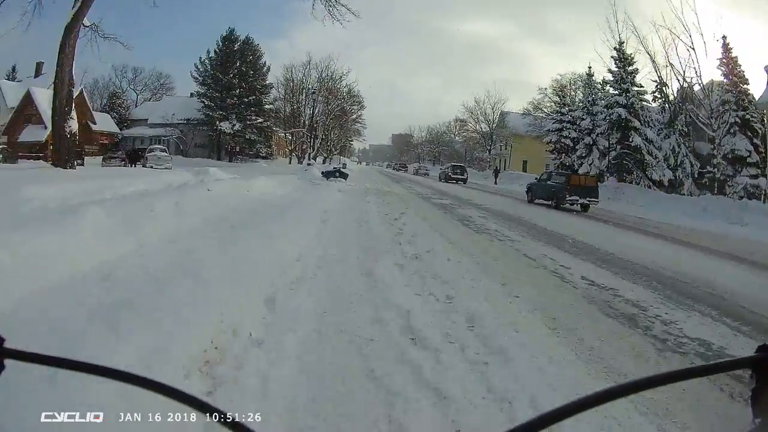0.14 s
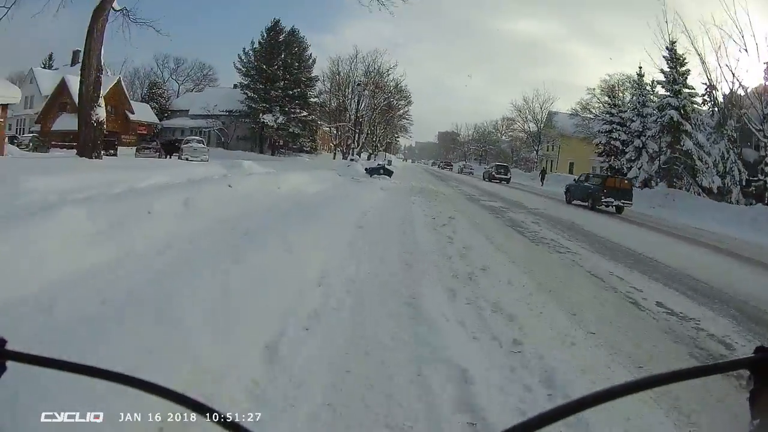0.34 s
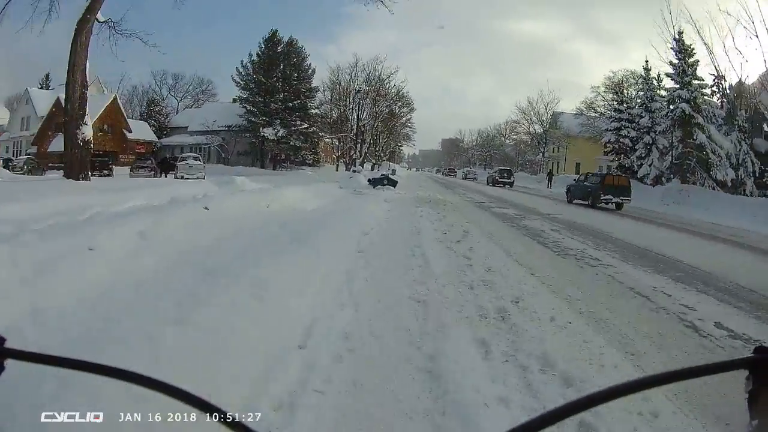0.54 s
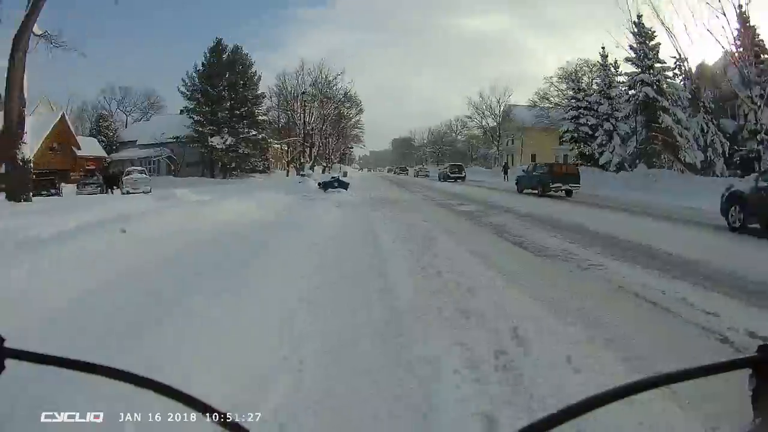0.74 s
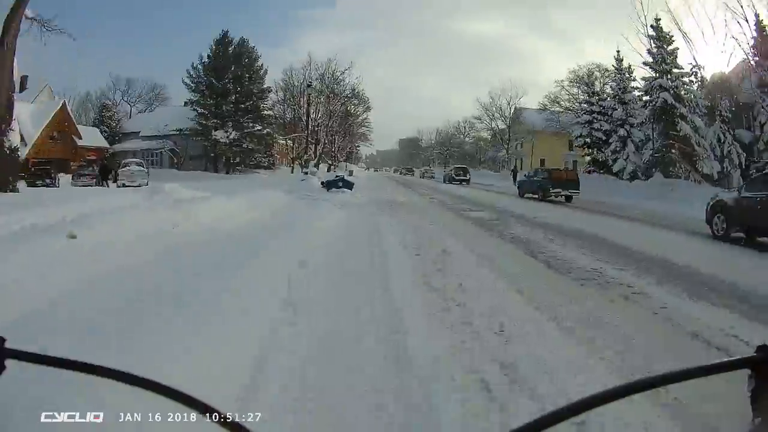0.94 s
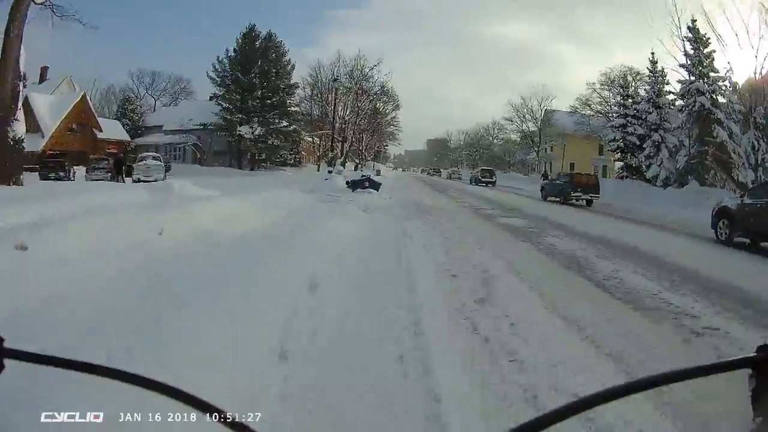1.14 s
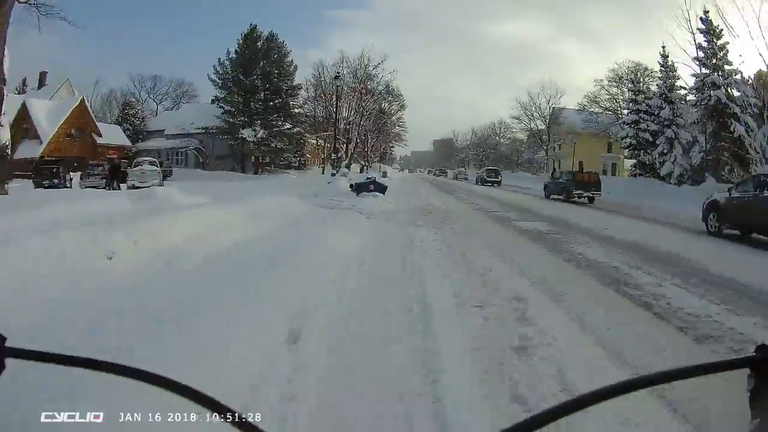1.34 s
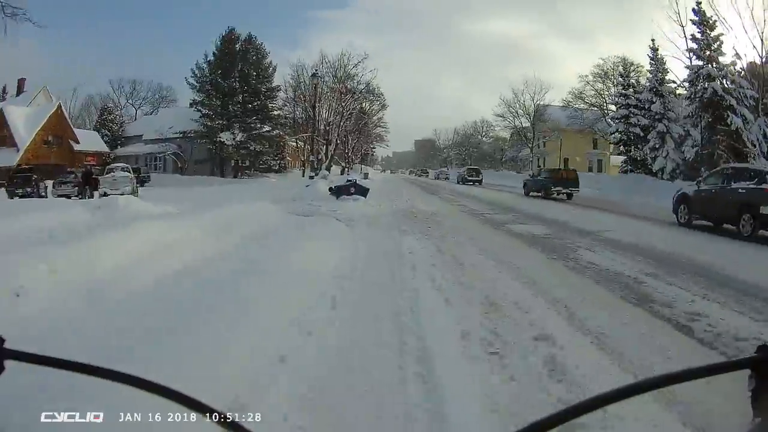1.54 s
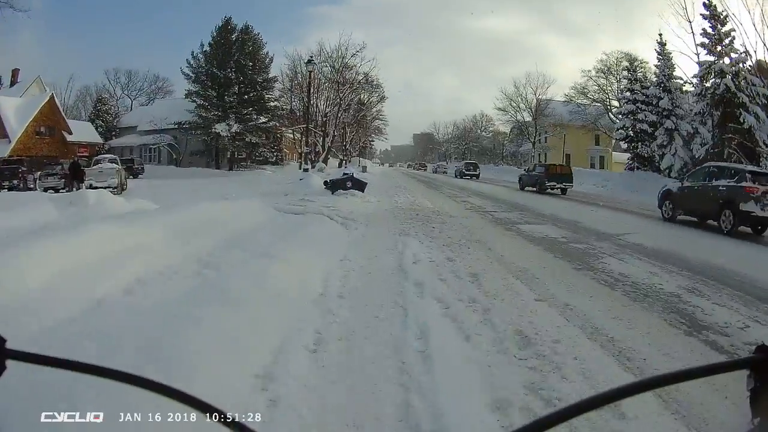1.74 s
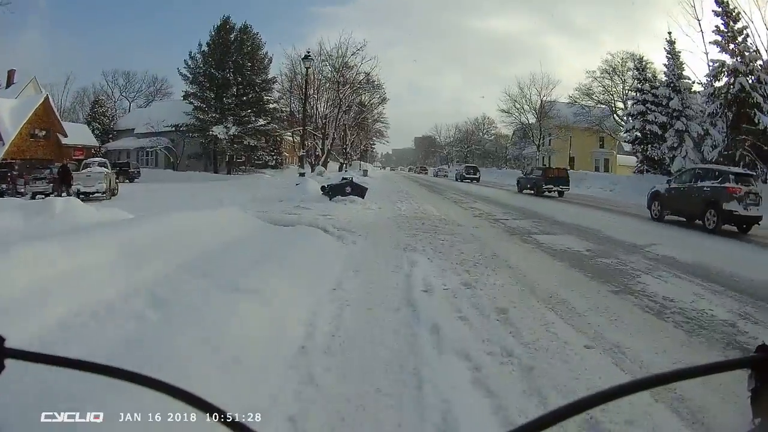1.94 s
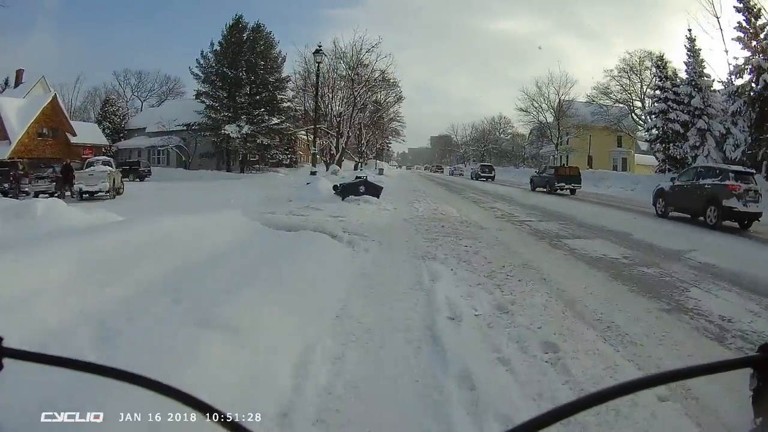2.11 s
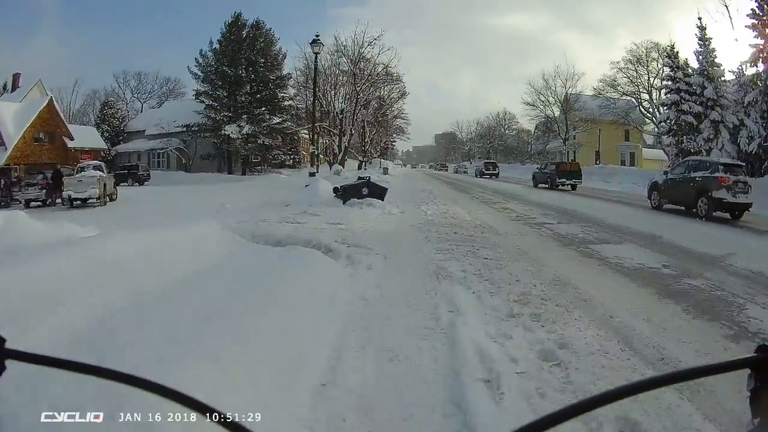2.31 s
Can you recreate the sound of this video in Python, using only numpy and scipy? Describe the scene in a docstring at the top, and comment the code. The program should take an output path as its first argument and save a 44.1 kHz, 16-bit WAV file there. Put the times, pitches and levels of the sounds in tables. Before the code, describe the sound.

A bicycle rides over bumpy packed snow, heard through its handlebar: constant low rumble and wavering hum, faint gritty crunch, and irregular hard knocks of a loose mount, often doubled, with short buzzes and tiny ticks.

```python
"""A small camera clamped to a bicycle's handlebar, riding over packed snow, hears through the frame.
From the start the fork hums near 80 Hz (a wavering sine), a frame tube drones (a resonator fed with noise),
and the tyres rumble (bands of noise) and crunch (random grains ringing the housing's modes).
Within milliseconds come the loose mount's knocks, mostly twice in quick succession: each a run of touches on
the same modes, with a buzz of grainy noise dying away from the same moment. Bumps swing the bar (soft pushes
on a resonator), and thin dry ticks (clicks) join later."""
import sys
import numpy as np
from scipy import signal
from scipy.io import wavfile

SR = 44100
rng = np.random.default_rng(int(sys.argv[2]) if len(sys.argv) > 2 else 0)


def dump_mix(stems):
    """Bounce the given channels to the path in sys.argv[1] as a 16-bit WAV at rate SR."""
    frames = np.atleast_2d(stems).T  # one column per channel
    limited = np.clip(frames, -1, 1)  # hard clip at full scale
    pcm = np.round(limited * 32767).astype(np.int16)
    wavfile.write(sys.argv[1], SR, pcm)


N = 104605  # length [samples]


def from_db(db):
    """Logarithmic level: the amplitude ratio of a level in dB."""
    return 10 ** (np.asarray(db) / 20)


def rms_one(x):
    """Normalisation: the signal scaled to an rms of 1."""
    return x / np.sqrt(np.mean(x ** 2) + 1e-20)


def in_time(rows):
    """Linear interpolation: each column of a curve, one value per sample."""
    s, *columns = np.transpose(rows)
    return [np.interp(np.arange(N) / SR, s, column) for column in columns]


def drift(rate_hz):
    """Low-passed noise: a slow random curve of rms 1, from two equal poles at rate_hz."""
    step = 40  # samples between the computed points
    pole = np.exp(-2 * np.pi * rate_hz * step / SR)
    settle = 2000  # points dropped while the filter settles
    noise = rng.standard_normal(N // step + settle + 2)
    slow = signal.lfilter([1], [1, -2 * pole, pole * pole], noise)[settle:]
    return np.interp(np.arange(N) / step, np.arange(len(slow)), rms_one(slow))


def clicks_at(s, size):
    """Impulse train: single-sample clicks at the given times [s]."""
    out = np.zeros(N)
    places = np.clip((np.asarray(s) * SR).astype(int), 0, N - 1)
    np.add.at(out, places, size)
    return out


def ring(excitation, hz, t60):
    """Damped resonance: a unit click sets off a sine of height 1 that falls by 60 dB in t60 [s]."""
    decay = from_db(-60 / (t60 * SR))  # per sample
    turn = 2 * np.pi * hz / SR  # phase per sample [rad]
    feedback = [1, -2 * decay * np.cos(turn), decay * decay]
    return signal.lfilter([0, np.sin(turn)], feedback, excitation + 1e-18)


def dull(x, hz):
    """Low-pass filtering: second order, loses the treble above hz."""
    return signal.sosfilt(signal.butter(2, hz, fs=SR, output="sos"), x)


# hum of the fork: (time [s], level before flutter [dB], pitch before waver [Hz])
FORK_HUM = [(0.0, -29, 79), (0.07, -30, 84.5), (0.14, -40, 85), (0.26, -21.5, 79.3), (0.33, -26.5, 81.2),
            (0.43, -32, 72.1), (0.51, -35, 71.1), (0.55, -43, 72.9), (0.64, -32, 79.1), (0.66, -34, 79.05),
            (0.74, -34.5, 74.25), (0.79, -27.5, 72.9), (0.84, -22.5, 73.8), (0.91, -32.5, 74.6),
            (0.96, -23.5, 77.7), (1.14, -24.5, 76.55), (1.17, -39, 78), (1.21, -29, 82), (1.27, -30, 81.3),
            (1.29, -39, 81.7), (1.34, -20, 81.7), (1.43, -26, 79.3), (1.46, -30, 83.3), (1.49, -35, 82.6),
            (1.55, -52, 84.66), (1.6, -25.5, 78.9), (1.64, -43, 79), (1.71, -20.5, 77.7), (1.75, -29, 80.7),
            (1.79, -37.5, 80.56), (2.01, -27, 80.57), (2.06, -36.5, 82.9), (2.21, -24.5, 84.56),
            (2.26, -46.5, 83.74), (2.29, -23.5, 82.9), (2.36, -19, 80.5)]
FORK_WAVER_HZ, FORK_FLUTTER_DB = 4.73, 2.5  # rms of the random pitch and level changes


def fork():
    """Frequency and amplitude modulation: a near sine wavers in pitch and level."""
    level_db, hz = in_time(FORK_HUM)
    phase = 2 * np.pi * np.cumsum(hz + FORK_WAVER_HZ * drift(9.84)) / SR
    level_db = level_db + FORK_FLUTTER_DB * drift(21)
    return np.sqrt(2) * from_db(level_db) * np.sin(phase)


# drone of a frame tube: (time [s], level before the gain [dB])
DRONE_LEVEL = [(0.0, -18.5), (0.07, -56), (0.41, -46.5), (0.48, -34), (0.55, -45.5), (1.06, -42),
               (1.09, -35), (1.59, -43.5), (1.62, -55), (1.72, -44), (2.35, -41.5), (2.37, -45)]
DRONE_HZ, DRONE_T60_S, DRONE_GAIN_DB = 296.3, 0.13, -4.5


def drone():
    """Sustained resonance: road noise keeps one long mode of the frame ringing."""
    level_db, = in_time(DRONE_LEVEL)
    road_noise = rng.standard_normal(N + SR)
    tube = ring(road_noise, DRONE_HZ, DRONE_T60_S)[SR:]  # without its first second of build-up
    return from_db(level_db + DRONE_GAIN_DB) * rms_one(tube)


# tyre rumble: (time [s], level before the gain [dB])
RUMBLE_LEVEL = [(0.0, -29), (0.08, -38), (0.49, -35.5), (1.04, -34), (1.16, -31), (1.23, -38.5),
                (1.27, -34.5), (1.35, -37.5), (1.5, -33.5), (1.6, -41), (1.74, -34), (1.75, -35.5),
                (2.04, -38.5), (2.05, -35), (2.12, -38), (2.21, -35), (2.34, -40), (2.36, -34)]
# spectrum of the rumble: (frequency [Hz], relative density [dB per Hz])
RUMBLE_SPECTRUM = [(12, -13.5), (30, -7), (60, -5.5), (120, -18), (170, -13.5), (245, -31.5), (330, -28.5),
                   (480, -33), (900, -43.5), (1900, -55), (4000, -74), (8000, -79.5), (15000, -103)]
RUMBLE_GAIN_DB, RUMBLE_PATCHY_DB = 8, 1.5


def rumble():
    """Band-filtered noise: third-octave bands flicker partly together, partly each on its own."""
    rumble_db, = in_time(RUMBLE_LEVEL)
    hz, density_db = np.transpose(RUMBLE_SPECTRUM)
    together = drift(6)
    edges = 11 * 2 ** np.arange(0, 10.6, 1 / 3)  # [Hz]
    white = rng.standard_normal((2, N + SR))  # neighbouring bands take different noise
    out = 0
    for k, (low, high) in enumerate(zip(edges, edges[1:])):
        band_filter = signal.butter(2, [low, high], "band", fs=SR, output="sos")
        band = signal.sosfilt(band_filter, white[k % 2])[SR:]
        level_db = np.interp(np.log(low * high) / 2, np.log(hz), density_db)  # at the band's centre
        flicker_db = RUMBLE_PATCHY_DB * (1.3 * together + drift(11.3))
        out = out + from_db(level_db + flicker_db) * band
    return from_db(rumble_db + RUMBLE_GAIN_DB) * rms_one(out)


# hardness of the snow crunch: (time [s], relative level [dB])
CRUNCH_LEVEL = [(0.0, -55), (0.11, -42), (0.21, -45.5), (0.51, -56), (0.62, -44), (1.31, -45.5),
                (1.69, -49.5), (2.36, -48.5)]
# modes of the housing, which the knocks ring too, slightly detuned:
# low modes: (frequency [Hz], relative level [dB], decay time t60 [s])
LOW_MODES = [(292.2, -4, 0.18), (422, -4.5, 0.11), (580.7, -2.5, 0.1), (648.4, -4, 0.15),
             (742.2, -0.5, 0.056), (1013, -4, 0.025), (1511, -1, 0.0094)]
# middle modes: (frequency [Hz], relative level [dB], decay time t60 [s])
MID_MODES = [(1665, -7.5, 0.016), (2307, -4, 0.028), (2430, -11, 0.023), (3068, -7.5, 0.02),
             (3107, -7, 0.027), (3682, -13.5, 0.01)]
# top modes: (frequency [Hz], relative level [dB], decay time t60 [s])
TOP_MODES = [(4545, -23, 0.012), (4610, -26.5, .012), (5310, -32.5, 0.019), (5880, -33, 0.0077),
             (6900, -41, 0.0064)]
GRAINS_PER_S, GRAIN_SIZE_DB, CRUNCH_SURGE_DB = 700, 3.5, 4.5  # rate between surges, size scatter, surge rms
CRUNCH_LOW_DB, CRUNCH_MID_DB, CRUNCH_TOP_DB = -1, -21, -33  # balance of the mode groups


def crunch():
    """Random impulses on resonances: snow grains break in surges, each ringing every mode by chance."""
    level_db, = in_time(CRUNCH_LEVEL)
    grain_rate = GRAINS_PER_S * from_db(CRUNCH_SURGE_DB * drift(14))
    born = np.flatnonzero(rng.random(N) < grain_rate / SR)
    sizes = from_db(GRAIN_SIZE_DB * np.minimum(rng.exponential(1, N), 5))[born]
    chance = rng.standard_normal((N // 8, 24))  # (grain, mode)
    groups = ((LOW_MODES, CRUNCH_LOW_DB), (MID_MODES, CRUNCH_MID_DB), (TOP_MODES, CRUNCH_TOP_DB))
    out, k = 0, 0
    for modes, gain_db in groups:
        rings = 0
        for hz, mode_db, t60 in modes:
            grains = clicks_at(born / SR, sizes * chance[:len(born), k])
            rings = rings + from_db(mode_db) * ring(grains, hz, t60)
            k += 1
        out = out + from_db(gain_db) * rms_one(rings)
    return from_db(level_db) * out


# knocks of the mount, levels before the gains:
# (time [s], level [dB], extra of the low modes [dB], of the top modes [dB], of the ping [dB])
MOUNT_KNOCKS = [(0.0034, -27.5, -5.5, -21, -42), (0.0107, -20, -4.5, -11, -48), (0.061, -67, 15, -3, -32),
                (0.1003, -44, 9.5, -12, -26), (0.1095, -22.5, -8.5, -31, -48), (0.184, -42, 2.5, -24, -32),
                (0.1919, -37.5, -3, -29, -37), (0.2652, -41.5, 9.5, -27, -44), (0.2728, -40, 0.5, -23, -46),
                (0.3892, -38, 4, -21, -40), (0.3942, -37, 4, -27, -46), (0.424, -56.5, 16.5, -13, -21),
                (0.4509, -33, -2.5, -11, -41), (0.4668, -35, 4.5, -24, -42), (0.489, -37, 3, -15, -33),
                (0.497, -33.5, -1.5, -26, -34.5), (0.5064, -55, 21, -7, -28), (0.552, -42.5, -19, -5, -26),
                (0.5683, -38.5, 6.5, -17, -42), (0.578, -25, -10, -26, -51), (0.6244, -50.5, 10, -10, -20),
                (0.6335, -48, -4, -15, -34), (0.676, -36.5, 1, -32, -54), (0.688, -38, -3.5, -33, -50),
                (0.7205, -44, 4, -29, -42), (0.7274, -33.5, -1.5, -33, -49), (0.7837, -42, 3.5, -20, -37),
                (0.8033, -51, 14, -21, -35), (0.814, -53.5, 20.5, -20.5, -38),
                (0.822, -39.5, 3, -22, -30.5), (0.8384, -52, -4, -13.5, -20), (0.879, -45, -3.5, -9.5, -25),
                (0.8885, -40, 0.5, -16, -48), (0.897, -36, 2, -28, -39.5), (0.929, -44, 7.5, -28.5, -29),
                (0.9348, -39, -2.5, -24, -36), (1.0205, -42.5, 0, -25.5, -45),
                (1.0241, -43.5, 6, -23.5, -45), (1.1402, -35.5, -0.5, -26, -43),
                (1.151, -38.5, 0, -43, -52), (1.1645, -45.5, -5, -20, -48), (1.1751, -48, 12.5, -26, -47),
                (1.2092, -53.5, 15.5, -28.5, -38), (1.2733, -31.5, -0.5, -12, -42),
                (1.2824, -26, -2.5, -29, -57), (1.3278, -47.5, 10.5, -1, -19), (1.3389, -51, 4.5, -6, -37),
                (1.3468, -56.5, 13, -5, -19), (1.3784, -27.5, -3.5, -11.5, -45), (1.4244, -49, 8, -16, -25),
                (1.4359, -41, -13, -3, -24), (1.475, -65, -2, -22, -33), (1.487, -31.5, 2, -8, -45),
                (1.499, -22.5, -10, -16, -57), (1.543, -53, -4, -16, -45), (1.5666, -35.5, -1, -26, -47),
                (1.5796, -31, -2.5, -36, -46), (1.6296, -41.5, 6.5, -30, -39),
                (1.6797, -59, 10.5, -19, -24), (1.727, -32.5, 0, -13, -48), (1.734, -28.5, -7, -24, -42),
                (1.784, -45, -5, -7.5, -23.5), (1.7996, -39.5, -10, -40, -37.5),
                (1.8047, -34.5, -4, -38, -48), (1.881, -38, 7.5, -25.5, -54), (1.9697, -54.5, 16, -11, -38),
                (2.051, -26, -11.5, -10, -45), (2.058, -20.5, -7.5, -23, -52), (2.08, -57, 22, -15, -20),
                (2.1067, -45, 2.5, -5, -23), (2.137, -52, 8, -21, -33), (2.1751, -50, -3, -15, -53),
                (2.1907, -34.5, -2.5, -12.5, -42), (2.1968, -30.5, 3, -30, -43),
                (2.3002, -38.5, 2.5, -19, -45), (2.3052, -31, -0.5, -30, -39), (2.3576, -54, 2, -13, -39),
                (2.3655, -39, 8.5, -17, -31)]
# the housing's highest mode: (frequency [Hz], relative level [dB], decay time t60 [s])
PING_MODE = [(8330, 4.7, 0.0056)]
KNOCK_GAIN_DB, LOW_GAIN_DB, TOP_GAIN_DB, PING_GAIN_DB = -4, 0.5, 23.5, 14
TOUCHES, CHATTER_S, CHATTER_LOSS_DB = 6, .0014, 4  # per knock, mean gap, loss per touch
SPREAD_DB, DETUNE = 0.5, 0.011  # level scatter, pitch shift as a fraction
LOW_SOFT_HZ, MID_SOFT_HZ, TOP_SOFT_HZ = 1740, 3900, 9000  # the soft contact dulls each group above these
CASE_SOFT_HZ = 9000


def knocks():
    """Modal excitation by repeated impact: each knock is a ragged run of touches ringing every mode."""
    s, knock_db, low_db, top_db, ping_db = np.transpose(MOUNT_KNOCKS)
    shape = (len(s), TOUCHES)
    lag = np.cumsum(rng.uniform(.3, 1.7, shape) * CHATTER_S, axis=1) - CHATTER_S
    touch_s = s[:, None] + lag
    sign = np.where(np.arange(TOUCHES) == 0, 1, rng.choice([-1, 1], shape))
    chance = rng.standard_normal((len(s), 24, TOUCHES))  # (knock, mode, touch)
    sharp = rng.random(shape) < 1 / 2  # these touches ring a little sharp, the others flat
    loss_db = CHATTER_LOSS_DB * np.arange(TOUCHES)
    # (modes, extra level [dB], softness [Hz], whether the modes alternate in sign)
    groups = ((LOW_MODES, low_db + LOW_GAIN_DB, LOW_SOFT_HZ, True),
              (MID_MODES, 0 * s, MID_SOFT_HZ, False),
              (TOP_MODES, top_db + TOP_GAIN_DB, TOP_SOFT_HZ, True),
              (PING_MODE, ping_db + PING_GAIN_DB, TOP_SOFT_HZ, True))
    out, k = 0, 0
    for modes, extra_db, soft_hz, alternate in groups:
        group = 0
        for hz, mode_db, t60 in modes:
            strike_db = (knock_db + extra_db)[:, None] + KNOCK_GAIN_DB + mode_db
            size = sign * from_db(strike_db + SPREAD_DB * chance[:, k] - loss_db)
            polarity = (-1) ** k if alternate else 1
            for half, shift in ((sharp, 1 + DETUNE), (~sharp, 1 - DETUNE)):
                touches = clicks_at(touch_s[half], size[half])
                group = group + polarity * ring(touches, hz * shift, t60)
            k += 1
        out = out + dull(dull(group, soft_hz), CASE_SOFT_HZ)
    return out


# the buzz starts at the times of MOUNT_KNOCKS and follows their levels
BUZZ_DB, BUZZ_T60_S, BUZZ_PER_S = -10.5, 0.061, 980  # level against the knock, decay, contact rate
BUZZ_LOW_HZ, BUZZ_HIGH_HZ = 900, 3530


def buzz():
    """Exponential decay of impact noise: dense tiny contacts die away from the start of every knock."""
    s, knock_db = np.transpose(MOUNT_KNOCKS)[:2]
    starts = clicks_at(s, from_db(knock_db + BUZZ_DB))
    decay = from_db(-60 / (BUZZ_T60_S * SR))  # per sample
    envelope = signal.lfilter([1], [1, -decay], starts + 1e-18)
    contacts = rng.standard_normal(N) * (rng.random(N) < BUZZ_PER_S / SR)
    band = signal.butter(2, [BUZZ_LOW_HZ, BUZZ_HIGH_HZ], "band", fs=SR, output="sos")
    return dull(signal.sosfilt(band, envelope * rms_one(contacts)), BUZZ_HIGH_HZ)


# bumps under the front wheel: (time [s], relative level [dB])
WHEEL_BUMPS = [(.005, -19.5), (0.149, -9), (0.242, -19), (0.369, -14), (0.432, -10), (0.553, -10),
               (.62, -18.5), (0.698, -20), (.76, -16), (.805, -16), (1.118, -9.5), (1.256, -14.5),
               (1.365, -14.5), (1.469, -10.5), (1.715, -13.5), (2.035, -12), (2.235, -11), (2.283, -10)]
BAR_HZ, BAR_T60_S = 18.1, 0.1
BUMP_SOFT_HZ, BUMP_RISE_S = 45, 0.0091  # softness of the push, its lead on the listed time


def bumps():
    """Impulse response of a damped oscillator: a soft downward push; the bar swings back and settles."""
    s, level_db = np.transpose(WHEEL_BUMPS)
    push = dull(clicks_at(s - BUMP_RISE_S, -from_db(level_db)), BUMP_SOFT_HZ)
    return 2 * ring(push, BAR_HZ, BAR_T60_S)


# thin dry ticks: (time before the lag [s], level before the gain [dB])
DRY_TICKS = [(0.1286, -77), (0.1638, -76), (0.2504, -75), (0.4436, -72.5), (0.4987, -75), (0.5736, -81.5),
             (0.9719, -66.5), (1.1253, -64.5), (1.3444, -76), (1.3733, -64), (1.4933, -65), (1.6096, -82),
             (1.7196, -70), (2.048, -76), (2.0684, -76), (2.237, -76), (2.2749, -70), (2.2998, -68)]
TICK_GAIN_DB, TICK_LAG_S, TICK_LOW_HZ, TICK_SOFT_HZ = 34.5, 0.00073, 2800, 10300


def ticks():
    """Band-limited impulse: each tick is one thin click of either sign without bass."""
    s, level_db = np.transpose(DRY_TICKS)
    sign = rng.choice([-1, 1], len(s))
    clicks = clicks_at(s + TICK_LAG_S, sign * from_db(level_db + TICK_GAIN_DB))
    soft = dull(clicks + 1e-18, TICK_SOFT_HZ)
    return signal.sosfilt(signal.butter(1, TICK_LOW_HZ, "high", fs=SR, output="sos"), soft)


def scene():
    """Superposition: all sources add at one microphone in the housing."""
    steady = fork() + drone() + rumble() + crunch()
    struck = knocks() + buzz() + bumps() + ticks()
    return (steady + struck)[None]


MIC_LOW_HZ, CUTOFF_HZ = 8.6, 15800


def record(dry):
    """Band limitation: the microphone loses the slowest swings and the top is cut steeply."""
    felt = signal.sosfilt(signal.butter(2, MIC_LOW_HZ, "high", fs=SR, output="sos"), dry)
    return signal.sosfilt(signal.cheby2(12, 70, CUTOFF_HZ, fs=SR, output="sos"), felt)  # 70 dB down


dry = scene()
out = record(dry)
dump_mix(out)
```